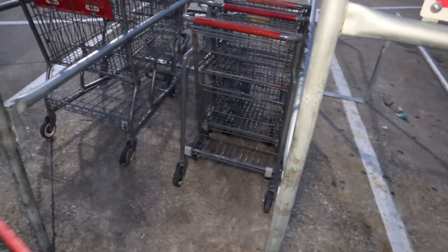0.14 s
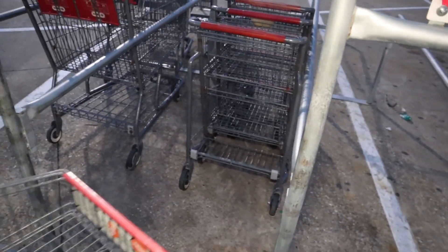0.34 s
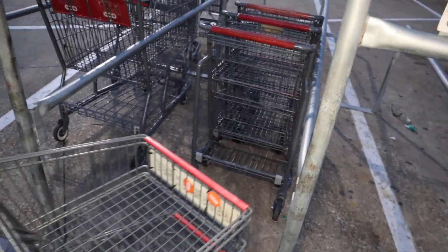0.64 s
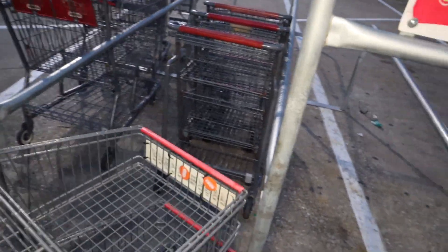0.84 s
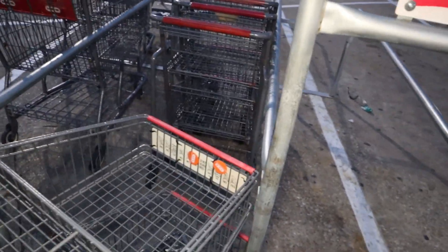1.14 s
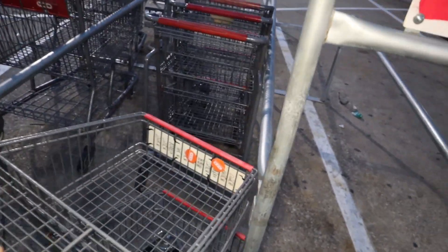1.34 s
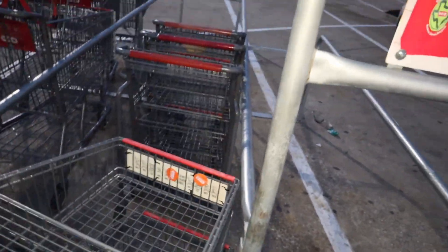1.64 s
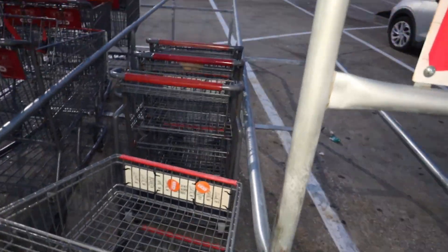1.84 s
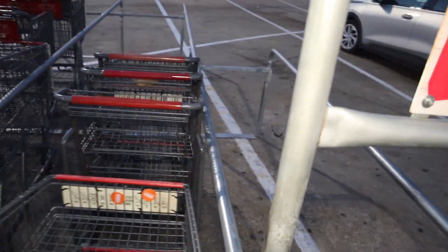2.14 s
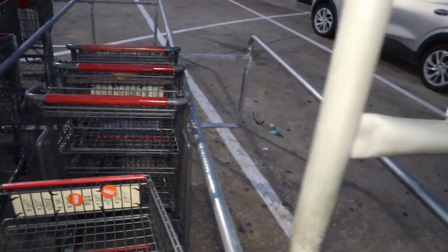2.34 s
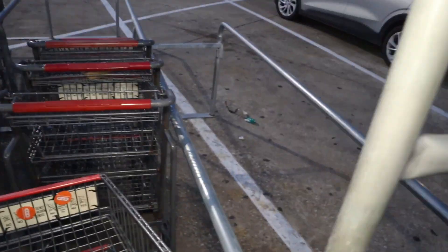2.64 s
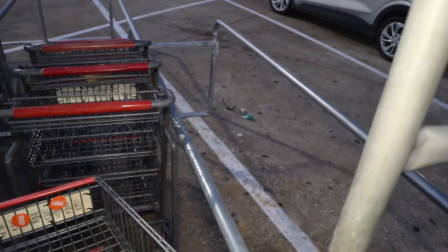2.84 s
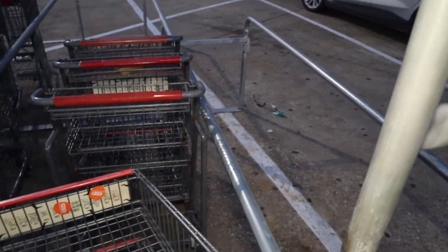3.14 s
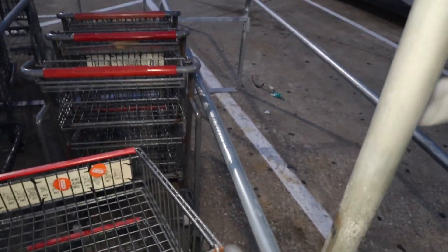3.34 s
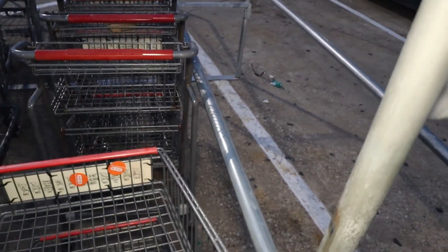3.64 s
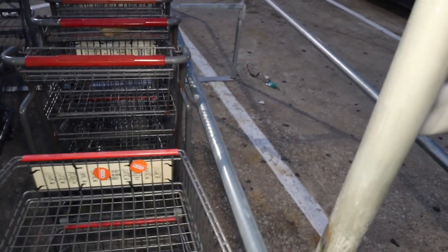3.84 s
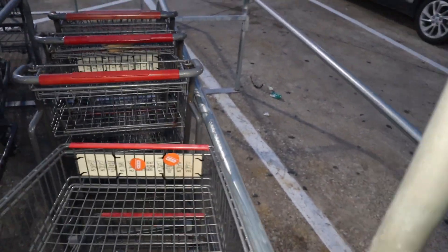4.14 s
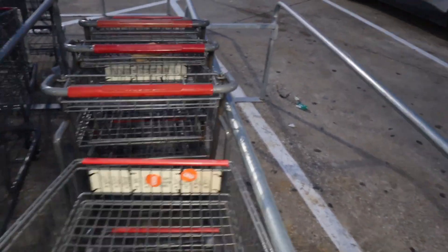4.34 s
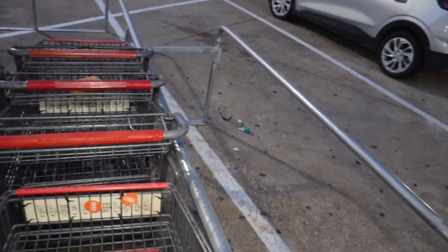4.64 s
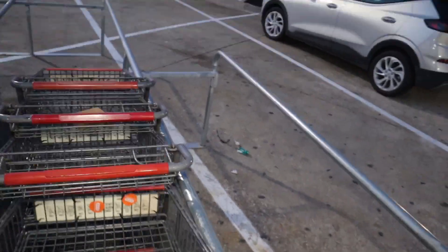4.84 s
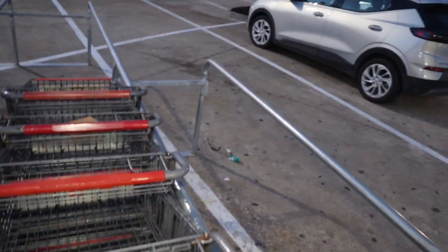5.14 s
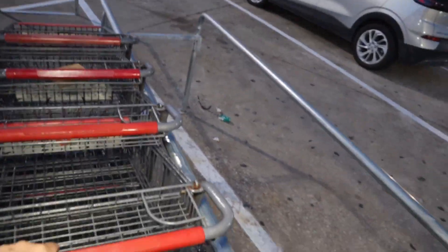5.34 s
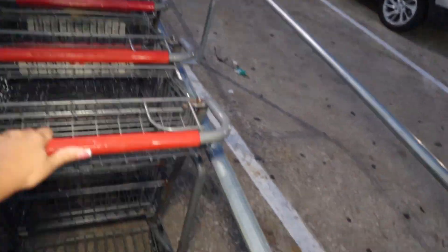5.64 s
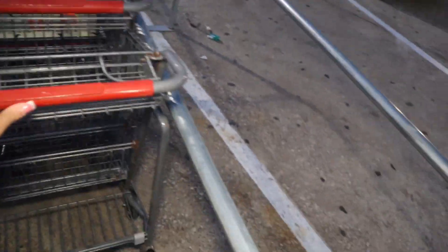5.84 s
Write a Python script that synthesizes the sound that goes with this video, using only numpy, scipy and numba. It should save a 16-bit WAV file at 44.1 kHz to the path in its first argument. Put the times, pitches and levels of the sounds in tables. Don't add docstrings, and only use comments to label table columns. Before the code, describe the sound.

Close handheld stereo sound of a wire shopping cart on rough asphalt outdoors, dry and bright. From the start, low wheel rumble and gritty grinding run under light mesh knocks and buzzing wires. At 0.4 to 1.0 s the cart bangs repeatedly: hard tube clanks, short pings, snapping wires and dense chatter. From 1.1 to 2.2 s it eases to uneven rolling with small knocks and a dry tap near 2.1. A brief jangle comes at 2.3 to 2.6 s, then rolling continues with soft wind puffs; low camera jolts peak at 3.2. Taps at 3.7 lead to a thump and loud ringing clang at 3.95, followed by crashing clatter until 4.5. Wheels quieten. More bright nesting bangs strike around 5.0, 5.3 and 5.45 s, with loose wires jangling, then faint rattles and soft rolling to the end at 6 s. Treble is wide, bass centred.

```python
import sys
import numpy as np
from scipy import signal
from scipy.fft import rfft, irfft
from scipy.io import wavfile
from scipy.ndimage import uniform_filter1d
from numba import njit

SR = 44100
rng = np.random.default_rng(int(sys.argv[2]) if len(sys.argv) > 2 else 0)


def level_to_linear(level):
    exponent = np.asarray(level, float) / 20
    return 10 ** exponent


def generate_wav(signal):
    frames = np.transpose(np.atleast_2d(signal))
    scaled = np.clip(frames, -1, 1) * 32767
    pcm = np.round(scaled).astype(np.int16)
    wavfile.write(sys.argv[1], SR, pcm)


N = 264595

# time_s, rumble_db
ROLL = [(0, -23), (.4, -24), (.72, -26), (.93, -40), (1.1, -31.5), (1.5, -28), (1.95, -25), (2.3, -24.5),
        (2.7, -24.5), (3.2, -27), (3.55, -25), (3.93, -25), (4.08, -29.5), (4.34, -36), (4.6, -34.5),
        (4.96, -30.5), (5.35, -40.5), (6, -34)]
# centre_s, half_length_s, rumble_lift_db, grind_lift_db
PATCHES = [(0.07, 0.053, -1.5, -1.5), (0.36, 0.056, 3.5, -2), (0.587, 0.077, 0.5, 5),
           (0.91, 0.043, -7, -12), (1.142, 0.018, -2, 1), (1.367, 0.045, 4.5, -1), (1.466, 0.067, -1.5, -2),
           (1.606, 0.05, -2, 0), (1.684, 0.033, 0, -3.5), (1.877, 0.044, 1, -2.5), (1.997, 0.043, -0.5, -2),
           (2.254, 0.023, 1, -1), (2.718, 0.095, -0.5, 0), (2.89, 0.088, 1.5, 3.5), (3.07, 0.089, 2, -1),
           (3.326, 0.18, 4, 1.5), (3.42, 0.024, -5.5, 0), (3.81, 0.065, 0, 2), (4.072, 0.052, -6, -11),
           (4.313, 0.061, -10, -8.5), (4.438, 0.032, 6, -0.5), (4.873, 0.041, 2.5, 0.5),
           (4.968, 0.037, 6, 0), (4.79, 0.023, 5, 2), (5.043, .03, -5, -1), (5.137, 0.04, 4, -6),
           (5.266, .04, 0.5, 4), (5.655, 0.052, 0.5, 2), (5.906, 0.082, 3.5, -4.5)]
# pitch_hz, level_db
RUMBLE_TONE = [(12, -38), (20, -5), (60, 1), (124, 1.5), (179, -6), (241, -10), (359, -17.5), (600, -23),
               (780, -21), (1320, -120)]
# pitch_hz, level_db
GRIND_TONE = [(150, -5), (250, -2), (364, -7.5), (663, -2), (881, -5), (1860, -12.5), (2670, -19.5),
              (4870, -27.5), (5600, -37), (7520, -29.5), (9000, -37.5), (11700, -40), (19800, -120)]
# pitch_hz, extra_side_db
TYRE_SPREAD = [(70, -23), (140, -11), (240, -0.5), (450, 1), (1000, 5), (2500, 3), (6000, 3)]
# pitch_hz, side_minus_mid_db
WIDTH = [(60, -19), (110, -16), (200, -13), (380, -10), (700, -7), (1290, -2), (2380, 3), (4400, 6),
         (8120, 8), (15000, 10)]

# start_s, peak_db, brightness_db_per_octave
SWING_KNOCKS = [(.0014, -19, 11), (.0545, -15.5, 9), (.1155, -16, 9.5), (.1735, -18.5, 6), (.235, -28, 13),
                (.2444, -16.5, 14), (.383, -9, 9.5), (.398, -12.5, -2), (.468, -11.5, -1), (.526, -9, -5),
                (.578, -6.5, -2), (.6473, -19.5, -7.5), (.7134, -7, -5.5), (.7532, -20, 15),
                (.803, -10.5, -4.5), (.8689, -8, -1), (.9756, -13, 3), (1.0788, -23.5, 11),
                (1.2086, -23, 4.5)]
# start_s, peak_db, brightness_db_per_octave
CRACK_KNOCKS = [(1.728, -24, -4.5), (1.7971, -21, 4.5), (1.8596, -25, 2), (2.0183, -19.5, 1),
                (2.1535, -18.5, 0), (2.2382, -32, -10.5), (2.2765, -11.5, 6), (2.3564, -37, -3),
                (2.381, -9.5, -1), (2.4512, -16, -4), (2.485, -27, 11), (2.518, -15, 4), (2.5494, -19, 5),
                (2.8236, -17.5, 3), (2.884, -22, 8), (2.945, -22.5, 1), (3.026, -31.5, -10.5),
                (3.229, -34, -5), (3.2907, -33, 3), (3.426, -31, 1), (3.7036, -14.5, -1),
                (3.714, -12.5, -2.5), (3.7606, -16, -2.5)]
# start_s, peak_db, brightness_db_per_octave
NESTING_KNOCKS = [(3.9366, -16.5, -8), (3.9453, -31, -9), (4.0197, -6.5, 3), (4.034, -8, 1.5),
                  (4.1094, -13, 0.5), (4.1682, -14.5, -7), (4.2087, -8, 2), (4.3001, -20, 7),
                  (4.4515, -8, 3), (4.4684, -9.5, 6), (4.6472, -12.5, 2.5), (4.8517, -25.5, 0),
                  (4.9141, -26, 0), (4.978, -11.5, 2.5), (5.011, -6.5, 5), (5.033, -11.5, 4),
                  (5.2289, -20.5, -5.5), (5.2767, -4, 5), (5.3094, -9.5, 6), (5.4293, -9, 2.5),
                  (5.4586, -10.5, 4), (5.5094, -13, 7.5), (5.7582, -28, 3), (5.8, -22, 5), (5.862, -25, -1)]
# start_s, length_s, level_db, brightness_db_per_octave
BUZZES = [(.002, 0.015, -30, -5), (.056, 0.017, -28, -4), (.118, 0.037, -29, -4.5), (.174, 0.015, -28, -4),
          (.246, .11, -29, -4.5), (.387, 0.024, -21.5, -1.5), (.582, 0.031, -20, 9), (.655, .03, -27, 1),
          (.745, 0.041, -20.5, 6), (.845, 0.059, -21.5, 7), (2.28, 0.054, -25.5, -2),
          (2.383, 0.049, -29.5, -4.5), (2.54, 0.059, -28, 0.5), (2.6, .04, -28, 1), (4.024, 0.045, -23, 4),
          (4.455, 0.02, -18.5, 2), (4.98, 0.014, -25.5, -3), (5.013, 0.02, -20, 2), (5.28, .045, -25, 0),
          (5.335, .018, -24.5, 6), (5.385, 0.032, -27, 1), (5.432, .02, -23, 3), (5.463, 0.018, -28, 11),
          (5.512, 0.025, -30, 2)]
# start_s, length_s, level_db, brightness_db_per_octave
RATTLES = [(0.135, 0.48, -32.5, 0), (0.696, 0.05, -17.5, 0), (0.82, 0.058, -19, 5.5),
           (0.95, 0.14, -24.5, -3.5), (1.154, 0.032, -35, -3), (1.92, 0.036, -38.5, 1.5),
           (2.158, 0.039, -39, -6), (2.3, 0.16, -35.5, -9.5), (2.52, 0.042, -24, -2.5),
           (2.856, 0.054, -32, -4), (3.685, 0.11, -38, -7), (4.003, 0.012, -21, -3),
           (4.177, 0.13, -16.5, 1), (4.412, 0.04, -20, -2), (4.545, 0.18, -32, -2.5),
           (5.051, 0.078, -26.5, -2.5), (5.278, 0.25, -26, -1.5), (5.557, 0.036, -36.5, -10.5),
           (5.742, 0.18, -44.5, -7.5)]
# pitch_hz, level_db
MESH_TONE = [(290, -57), (500, -35.5), (935, -18), (1410, -16), (2020, -10), (2760, -9.5), (3180, -6.5),
             (3720, -5.5), (5010, -4), (8020, -3), (10400, -1), (11800, -9), (15000, -33)]
# pitch_hz, width_hz, lift_db
FRAME_TUBES = [(1500, 28, 8.5), (1860, 130, 3.5), (2070, 54, 1.5), (3560, 31, -4), (4020, 56, 2),
               (4690, 36, 4.5), (8420, 34, -3)]
# pitch_hz, extra_side_db
METAL_SPREAD = [(400, -15), (1200, -3), (3000, 0.5), (12000, -1)]
# start_s, peak_db
SNAPS = [(0.237, -14), (0.3877, -3), (0.3993, 2), (0.5314, 1), (0.5804, -4), (0.6609, -6), (0.7083, -5),
         (0.7226, -9), (0.7497, -6.5), (0.7542, -5), (0.7709, -7), (0.7756, 1), (0.7865, 2), (0.8132, -6),
         (0.8487, -4), (0.871, -1), (0.934, -8), (1.0497, -7), (1.2101, -13), (2.3573, -1), (2.3843, -1),
         (2.5168, -8), (2.5521, -9), (3.232, -12.5), (3.7043, -16), (3.7152, -2), (3.762, -14), (3.9503, 3),
         (4.0022, -5), (4.0212, 6), (4.0295, 4), (4.0358, 1), (4.0664, -1), (4.0885, -11), (4.1318, -2),
         (4.1857, 0), (4.195, 0), (4.2093, -5), (4.2159, 1), (4.2202, -2), (4.2353, -2), (4.2535, 0),
         (4.2705, -1), (4.282, -3), (4.3028, -3), (4.3229, -3), (4.3361, -7), (4.4583, -1), (4.47, 3),
         (4.497, -6), (4.9802, 1), (4.9845, 0), (5.01, 2), (5.0293, -2), (5.0418, -4), (5.2797, 0),
         (5.3043, -2), (5.3178, -1), (5.3224, -3), (5.5235, -3)]

# start_s, peak_db, pitch_hz, fall_of_other_modes_db_per_octave
CLANKS = [(0.385, -8.5, 3575, 31), (.524, -10, 894, 2), (.529, 0.5, 890, 1.5), (.533, -6, 1920, 0),
          (.554, -8, 816, 28), (.583, -21, 1940, 6.5), (0.605, -3.5, 1870, 2), (.705, -6, 1990, 15),
          (.714, 2, 1860, 22), (.722, -10, 1860, 29), (.731, -7, 1612, 5), (.749, -8.5, 1480, 6),
          (.804, -5, 3730, -1), (.977, -6, 1926, 8), (0.984, -10, 1130, 9), (1.035, -13, 1990, 23),
          (1.768, -18, 2000, 13), (2.429, -12, 727, 16), (2.822, -12.5, 760, 11), (3.713, -17, 720, 22),
          (3.936, -3.5, 2070, 10), (3.94, -4, 812, -4), (3.947, 5, 2077, 4.5), (3.958, -4, 1920, 12),
          (3.977, -7, 1830, 6), (3.998, -9, 1670, 13.5), (4.031, -21, 1543, 2), (4.17, -10, 1290, 0),
          (4.18, -4.5, 872, 6), (4.186, -4.5, 1287, 4), (4.201, -9.5, 800, 8), (4.214, -18, 900, 0),
          (4.252, -14, 1500, 2), (4.3, -16, 844, 6), (4.449, -1, 4440, 2), (4.43, -15, 1310, 6),
          (5.009, -18, 2090, 8), (5.044, -18, 1880, 14), (5.068, -18, 1620, 14), (5.101, -22, 1990, 12),
          (5.25, -11, 918, 1.5), (5.283, -15.5, 1500, 27), (5.32, -22, 1900, 10), (5.485, -29, 2000, 12),
          (5.515, -17, 2150, 17), (5.529, -24, 917, 19), (5.88, -25.5, 1176, 29)]
# start_s, peak_db, pitch_hz, ring_t60_s
PINGS = [
    (0.527, -3.5, 4190, 0.03),
    (0.6494, -7, 3490, 0.048),
    (0.8043, -3, 3690, 0.03),
    (2.357, -20, 4530, 0.17),
    (2.4512, -7.5, 3880, 0.03),
    (3.9692, -10, 3945, 0.065),
    (5.2774, -9, 5000, 0.081),
]
# start_s, peak_db, pitch_hz, ring_t60_s
TAPS = [
    (2.107, -9, 943, 0.04),
    (3.225, -18, 670, 0.04),
    (3.426, -22, 725, 0.04),
    (4.852, -15.5, 1000, 0.018),
    (4.858, -14.5, 550, 0.027),
    (4.915, -31, 700, 0.04),
]
# centre_s, half_length_s, level_db
GUSTS = [(0.397, 0.1, -37), (.6, .04, -50), (1.2, .08, -60), (2.3, 0.23, -55), (2.89, 0.066, -39),
         (3.126, 0.17, -36), (3.444, 0.13, -49), (3.64, 0.075, -43), (3.79, 0.049, -34),
         (3.928, 0.059, -32.5), (4.1, 0.16, -52), (4.55, 0.13, -55), (4.8, .05, -46), (5.117, 0.036, -46)]
# pitch_hz, level_db
WIND_TONE = [(20, -22), (60, -1), (130, 1.5), (250, -8.5), (500, -19), (1200, -52)]
# start_s, peak_db, pitch_hz, side_share
THUMPS = [
    (0.401, -14, 88, 0.1),
    (1.358, -19, 75, 0),
    (3.028, -23, 161, 0.8),
    (3.079, -26, 51.1, 0.4),
    (3.17, -10.5, 61.4, 0.6),
    (3.215, -1.5, 119, 0.3),
    (3.927, -6.5, 60.3, 0.3),
    (4.018, -29, 88.8, 0.5),
    (4.859, -24, 202, 0.24),
    (4.972, -27, 92, 0.3),
]
# pitch_hz, extra_side_db
JOLT_SPREAD = [(30, -16), (120, 4), (400, 10)]

# pitch_hz, mid_minus_side_db
MASK = [(2000, -15), (4000, -14.5), (6000, -12), (8300, -6), (10000, -11), (11500, -5), (16000, 1)]
# centre_s, half_length_s, mask_lift_db
MASK_SPELLS = [
    (.2, 0.29, 2.5),
    (0.904, .2, -2),
    (1.48, 0.23, -10.5),
    (2.25, .2, 3),
    (3.3, 0.29, -2.5),
]
# centre_s, half_length_s, top_hz
OPEN_TOP = [(.07, .03, 14500), (.15, .07, 13200), (.26, .012, 15500), (.39, .012, 15700), (.45, .05, 13700),
            (.675, .012, 14300), (1.21, .012, 13500), (1.47, .06, 13500), (2.28, .012, 13500),
            (2.39, .015, 12900), (2.53, .06, 12300), (2.83, .015, 13300), (3.23, .012, 14500),
            (3.43, .012, 15300), (3.715, .012, 14000), (3.95, .012, 15700), (4.03, .02, 14600),
            (4.47, .024, 15700), (4.64, .012, 14000), (5.015, .012, 15700), (5.275, .012, 15500),
            (5.46, .012, 13000), (5.545, .012, 15500)]

BANDS, WIRES = 24, 900
IDLE_DB, IDLE_BRIGHT_DB = -30, 11.5
RISE_DB_S, FALL_DB_S = 161, 100
BUZZ_RISE_DB_S, BUZZ_FALL_DB_S = 3000, 600
SWING_RING_S, CRACK_RING_S, NEST_RING_S = 0.45, 0.46, 0.4
SCRAPE_S = 0.0043
SWAY_HZ = 7
SNAP_S, SNAP_DB, SNAP_HZ = 0.00015, -2, 5330
CLANK_T60_S, THINNER = 0.075, 0.65
GRIND_DB, GRIND_SHARE = -31.5, 0.98
SHAKEN_DB, DULL_SHARE = -16, 0.34
DUCK_DB, DUCK_SHARE, DUCK_S = -18, 0.22, 0.028
HUNGER_SHARE, HUNGER_DB, HUNGRY_UNTIL_S = 0.059, 3, 3.2
CEILING_HZ = 11800


def read(table, hz):
    f, db = np.transpose(table)
    return np.interp(np.log(hz), np.log(f), db)


def colour(x, table):
    hz = np.maximum(np.fft.rfftfreq(N, 1 / SR), 1)
    return irfft(rfft(x) * level_to_linear(read(table, hz)), N)


def unit(x):
    return x / np.sqrt(np.mean(x ** 2))


def curve(table):
    return np.interp(np.arange(N) / SR, *np.transpose(table))


def bells(centre_s, half_s):
    return np.exp(-((np.arange(N) / SR - centre_s[:, None]) / half_s[:, None]) ** 2)


def walk(rate):
    k = int(SR / rate)
    steps = np.repeat(rng.standard_normal(N // k + 1), k)[:N]
    return 1.48 * uniform_filter1d(uniform_filter1d(steps, k), k)


def ticks(rate, scatter_db, rows):
    hit = rng.random((rows, N)) < rate / SR
    size_db = scatter_db * np.minimum(rng.exponential(size=hit.sum()), 4)
    x = np.zeros((rows, N))
    x[hit] = level_to_linear(size_db) * rng.choice([-1, 1], hit.sum())
    return unit(x)


def spread(mid_side, table):
    return np.array([mid_side[0], colour(mid_side[1], table)])


def narrow(side):
    return colour(side, [(hz, -db) for hz, db in WIDTH])


def lean(mid_side, share, turn):
    mid, side = mid_side
    along = np.real(signal.hilbert(narrow(side)) * np.exp(1j * turn))
    return np.array([np.sqrt(1 - share ** 2) * mid + share * along, side])


def patches():
    centre_s, half_s, *lift_db = np.transpose(PATCHES)
    return np.array(lift_db) @ bells(centre_s, half_s)


def wheels(rumble_db, grind_db):
    stones = ticks(900, 1.65, rows=2)
    grit = ticks(5000, 1.74, rows=2)
    rumble_db = rumble_db + 0.93 * walk(4.5)
    grind_db = grind_db + 0.9 * walk(14)
    out = 0
    for kicks, tone, db in ((stones, RUMBLE_TONE, rumble_db), (grit, GRIND_TONE, grind_db)):
        mid, side = colour(kicks, tone)
        side = level_to_linear(-4.0) * colour(side, [(25, -29)] + WIDTH)
        out = out + level_to_linear(db) * np.array([mid, side]) / np.sqrt(np.mean(mid ** 2))
    return out


def knocks():
    stages = (SWING_KNOCKS, SWING_RING_S), (CRACK_KNOCKS, CRACK_RING_S), (NESTING_KNOCKS, NEST_RING_S)
    return [(*row, ring_s) for rows, ring_s in stages for row in rows]


def chatter(roll_db):
    t = np.arange(N) / SR
    power = level_to_linear(2 * (roll_db + IDLE_DB))
    bright = power * IDLE_BRIGHT_DB
    for rows, rise, fall in ((RATTLES, RISE_DB_S, FALL_DB_S), (BUZZES, BUZZ_RISE_DB_S, BUZZ_FALL_DB_S)):
        for s, long_s, db, bright_db in rows:
            before, after = np.maximum(s - t, 0), np.maximum(t - s - long_s, 0)
            spell = level_to_linear(2 * (db - rise * before - fall * after))
            power = power + spell
            bright = bright + spell * bright_db
    return 10 * np.log10(power), bright / power


@njit
def ring(force, band, turn, weight, sway):
    out = np.zeros((2, force.shape[1]))
    for k in range(len(turn)):
        z, w = 1e-18 + 0j, weight[k]
        for i in range(force.shape[1]):
            z = z * turn[k] + force[band[k], i]
            w *= sway[k]
            out[k % 2, i] += (w * z).imag
    return out


def mesh(chatter_db, bright_db):
    centre = np.geomspace(600, 15000, BANDS)
    octave = np.log2(centre / 6000)[:, None]
    crowd = 1.5
    hz = 600 + (15000 - 600) * ((np.arange(WIRES) + rng.random(WIRES)) / WIRES) ** crowd
    band = np.clip(np.searchsorted(centre, hz), 0, BANDS - 1)
    t60 = 0.036 * level_to_linear(1.2 * rng.standard_normal(WIRES)) * (3000 / hz) ** 0.32

    frame_db = sum(db / (1 + ((hz - f) / width) ** 2) for f, width, db in FRAME_TUBES)
    gain = level_to_linear(read(MESH_TONE, hz) + frame_db + 1.06 * rng.standard_normal(WIRES))
    gain = gain * np.sqrt((hz - 500) ** (1 - 1 / crowd) * .07 / t60)
    gain = gain / np.sqrt(np.sum(gain ** 2) / 4)
    is_mid = np.arange(WIRES) % 2 == 0
    weights = gain * np.exp(2j * np.pi * rng.random(WIRES)) * level_to_linear((1.08 - read(WIDTH, hz)) * is_mid)

    shake = level_to_linear(chatter_db - 18.5 + bright_db * octave)
    force = np.zeros((BANDS, N))
    t = np.arange(SR // 2) / SR
    events = knocks()
    chance = 0.52 * uniform_filter1d(rng.standard_normal((len(events), BANDS)), size=3)
    scrape = rng.standard_normal((len(events), SR // 10))
    span = SCRAPE_S * SR
    rise = np.arange(SR // 10) / span
    for (s, db, tilt_db, ring_s), luck, noise in zip(events, chance, scrape):
        i = int(s * SR)
        blow = level_to_linear(db - 11.5 + tilt_db * octave + 0.7 * luck[:, None])
        push = noise * (rise + 0.84) * np.exp(-rise) * 2 / np.sqrt(span)
        force[:, i:i + SR // 10] += (blow * push)[:, :N - i]
        shower = level_to_linear(-17.5 - 60 * t / ring_s * 2 ** (0.09 * octave))
        shake[:, i:i + len(t)] = np.hypot(shake[:, i:i + len(t)], (blow * shower)[:, :N - i])
    force += shake * ticks(3000, 1.6, rows=3)[np.sort(rng.integers(0, 3, BANDS))]
    turn = np.exp((2j * np.pi * hz - np.log(1000) / t60) / SR)
    sway = np.exp(2j * np.pi * SWAY_HZ * rng.standard_normal(WIRES) / SR)
    rings = ring(force, band, turn, weights, sway)

    click = colour(shake[BANDS * 2 // 3] * ticks(220, 4.0, rows=1)[0], MESH_TONE)
    click = level_to_linear(-18.5) * np.sqrt(np.mean(rings[1] ** 2)) * unit(click)
    return rings + np.array([narrow(click), click])


def snaps():
    out, k = np.zeros((2, N)), np.arange(-64, 64)
    t = k / SR - .0002
    for (s, db), (pitch, phase) in zip(SNAPS, rng.random((len(SNAPS), 2))):
        hz = SNAP_HZ * (.8 + .6 * pitch)
        sign_turn = np.round(phase) / 2
        pulse = np.cos(2 * np.pi * (hz * t + sign_turn)) * np.exp(-(t / SNAP_S) ** 2)
        out[:, int(s * SR) + k] += level_to_linear(db + SNAP_DB) * pulse * level_to_linear([[-14.0], [0]])
    return out


def tubes():
    out, t = np.zeros((2, N + SR)), np.arange(SR // 4) / SR
    events = [(s, db, hz, CLANK_T60_S * (1000 / hz) ** THINNER, fall_db) for s, db, hz, fall_db in CLANKS]
    events += [(*row, 4) for row in TAPS]
    events += [(*row, 99) for row in PINGS]
    chance = rng.random((len(events), 3, 30))
    crunch = rng.standard_normal((len(events), SR // 40)) * np.exp(-np.arange(SR // 40) / (0.0021 * SR))
    for (s, db, hz, t60, fall_db), (scatter, *phases), push in zip(events, chance, crunch):
        push = np.append(3.5, push)
        octave = np.linspace(-.4, 2.2, num=30) + 0.08 * scatter
        octave[4] = 0
        f = np.minimum(hz * 2 ** octave, .4 * SR)
        size = level_to_linear(-fall_db * np.abs(octave) * np.where(octave < 0, 4.0, 1))
        size[4] = level_to_linear(7.5)
        fade = np.exp(-np.log(1000) * t / t60)
        pair = []
        for phase, wide_db in zip(phases, (0 * f, read(WIDTH, f) - 2.5)):
            modes = np.sin(2 * np.pi * (np.outer(f, t) + phase[:, None]))
            pair.append((size * level_to_linear(wide_db)) @ modes * fade)
        pair = signal.fftconvolve(np.array(pair), push[None], axes=1)
        out[:, int(s * SR):int(s * SR) + pair.shape[1]] += pair / np.abs(pair).max() * level_to_linear(db - 7.0)
    return out[:, :N]


def wind():
    centre_s, half_s, db = np.transpose(GUSTS)
    gust = level_to_linear(db) @ bells(centre_s, half_s)
    flutter = level_to_linear(4.7 * walk(30))
    return gust * flutter * unit(colour(rng.standard_normal((2, N)), WIND_TONE)) * level_to_linear([[-3], [-3.5]])


def thumps():
    out, t = np.zeros((2, N + SR)), np.arange(SR // 5) / SR
    for s, db, hz, share in THUMPS:
        pulse = level_to_linear(db - 6.0) * np.sin(2 * np.pi * hz * t) * np.exp(-t * hz)
        out[:, int(s * SR):int(s * SR) + len(t)] += pulse * np.array([[1], [share]])
    return out[:, :N]


def duck(metal):
    hold = np.exp(-1 / (DUCK_S * SR))
    heard = signal.lfilter([1 - hold], [1, -hold], np.mean(metal ** 2, axis=0))
    return -DUCK_SHARE * 10 * np.log10(1 + heard / level_to_linear(2 * DUCK_DB))


def scene():
    roll_db = curve(ROLL)
    chatter_db, bright_db = chatter(roll_db)
    metal = mesh(chatter_db, bright_db) + tubes() + snaps()
    metal = spread(lean(metal, share=.4, turn=-1.45), METAL_SPREAD)
    rumble_db = roll_db + duck(metal)
    rolling_db = GRIND_DB + GRIND_SHARE * (rumble_db + 26.5)
    shaken_db = chatter_db + SHAKEN_DB - DULL_SHARE * bright_db
    grind_db = 10 * np.log10(level_to_linear(2 * rolling_db) + level_to_linear(2 * shaken_db))
    rough_db = patches()
    rolling = wheels(rumble_db + rough_db[0], grind_db + rough_db[1])
    rolling = spread(lean(rolling, share=.65, turn=-2.8), TYRE_SPREAD)
    mid, side = metal + spread(thumps(), JOLT_SPREAD) + rolling + wind()
    return np.array([mid + side, mid - side])


def drop_hidden(mid_side, reach_db, chance_db, attack_db):
    frame = dict(window="cosine", nperseg=2048, noverlap=1024)
    _, s, bins = signal.stft(mid_side, SR, **frame)
    level_db = 10 * np.log10(np.mean(np.abs(bins[:, :1024].reshape(2, 64, 16, -1)) ** 2, axis=2) + 1e-20)
    hz = (np.arange(64)[:, None] + .5) * SR / 128
    top_db = level_db[1, 12:32].max(axis=0)
    luck = uniform_filter1d(rng.standard_normal(level_db.shape), size=2)
    luck_db = chance_db * 2 * uniform_filter1d(luck, size=2, axis=1)
    keep = (level_db + luck_db > top_db - np.array(reach_db)[:, None, None]) | (hz < 10000)
    slow_db = uniform_filter1d(top_db, size=15)
    hunger_db = HUNGER_SHARE * (slow_db - slow_db.mean()) + HUNGER_DB * np.tanh(2 * (HUNGRY_UNTIL_S - s))
    hunger_db += sum(db * np.exp(-((s - at_s) / half_s) ** 2) for at_s, half_s, db in MASK_SPELLS)
    keep[0] &= level_db[0] + luck_db[0] > level_db[1] + read(MASK, hz) + hunger_db
    keep |= (np.diff(top_db, prepend=0) > attack_db) & (hz < 13500)
    keep[0] &= hz < CEILING_HZ + 130 * uniform_filter1d(luck_db[0], size=9, axis=0)
    for at_s, half_s, top_hz in OPEN_TOP:
        keep |= (np.abs(s - at_s) < half_s) & (hz > 10000) & (hz + 200 * luck_db < top_hz)
    bins[:, :1024] *= np.repeat(keep, 16, axis=1)
    return signal.istft(bins, SR, **frame)[1][:, :N]


def top_cut(x):
    return signal.sosfilt(signal.butter(12, 15710, fs=SR, output="sos"), x)


def record(dry):
    fade = signal.butter(6, 15500, fs=SR, output="sos")
    left, right = np.clip(signal.sosfilt(fade, dry), -1, 1)
    mid_side = np.array([left + right, left - right]) / 2
    mid, side = drop_hidden(mid_side, reach_db=[16, 21], chance_db=2.5, attack_db=6)
    return top_cut(np.array([mid + side, mid - side]))


dry = scene()
out = record(dry)
generate_wav(out)
```